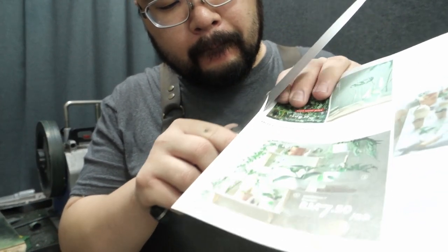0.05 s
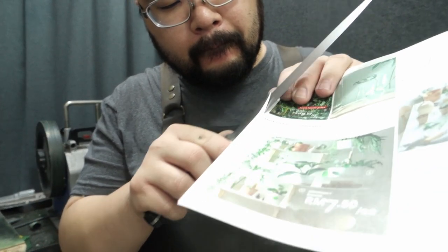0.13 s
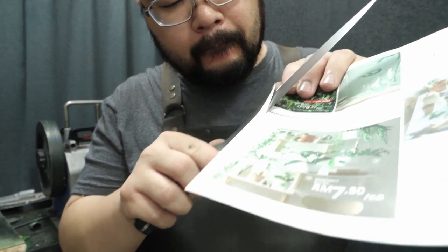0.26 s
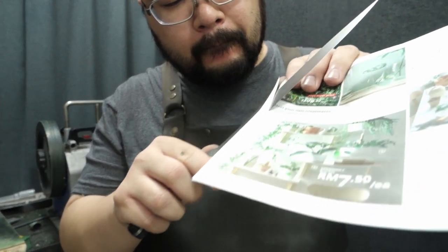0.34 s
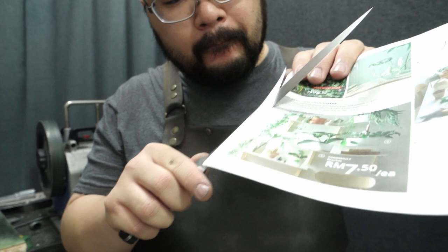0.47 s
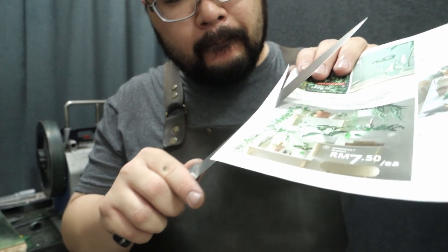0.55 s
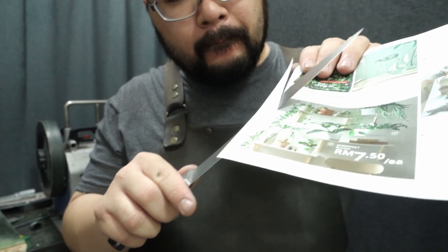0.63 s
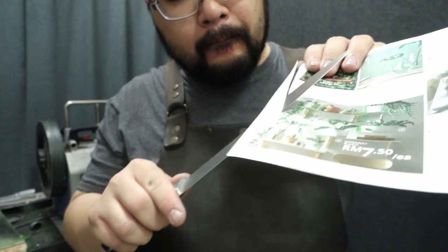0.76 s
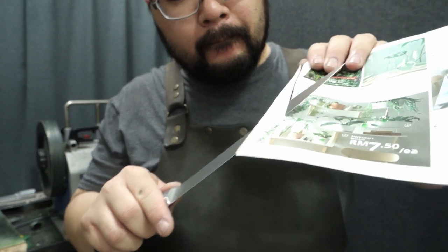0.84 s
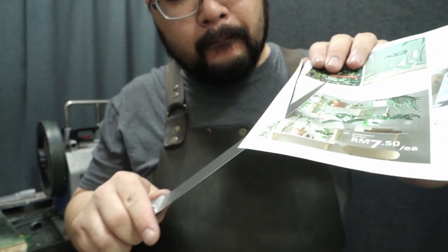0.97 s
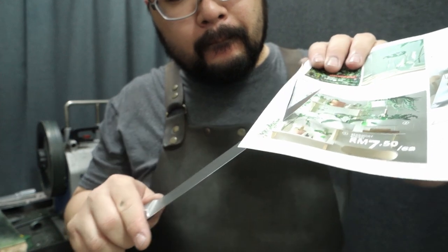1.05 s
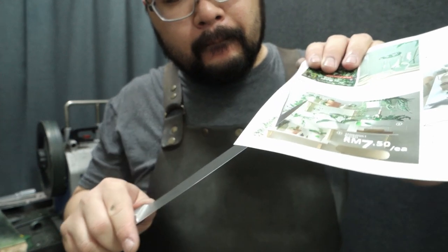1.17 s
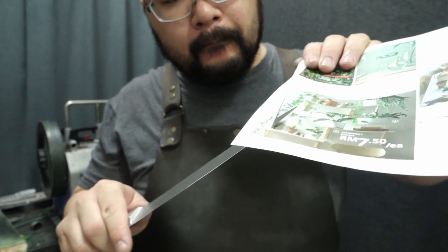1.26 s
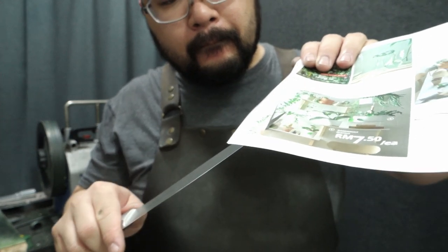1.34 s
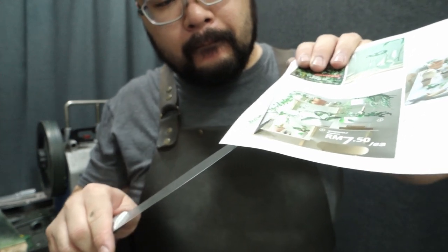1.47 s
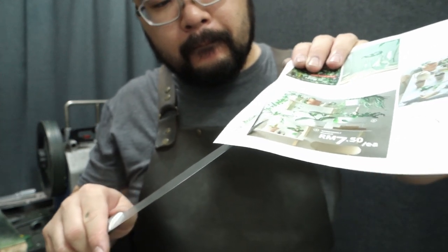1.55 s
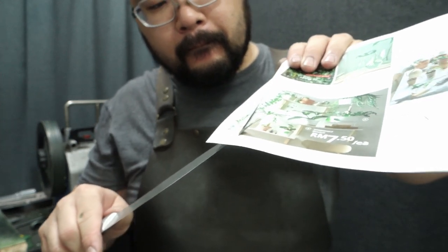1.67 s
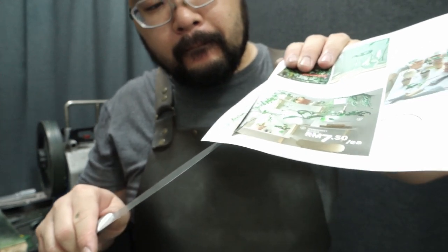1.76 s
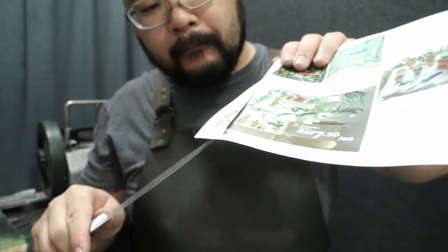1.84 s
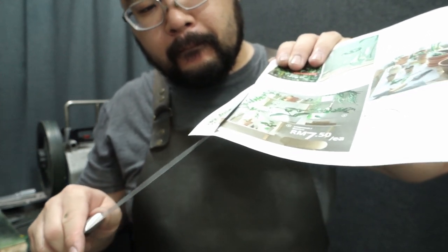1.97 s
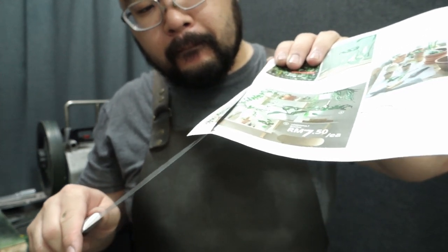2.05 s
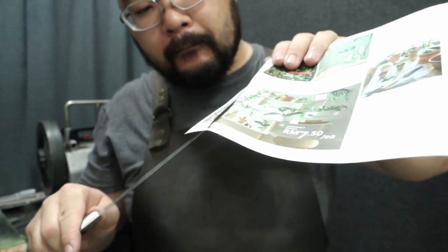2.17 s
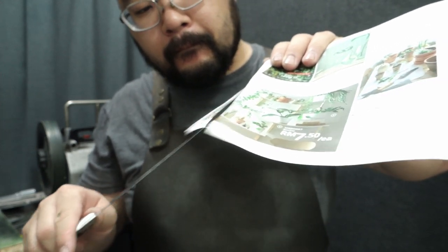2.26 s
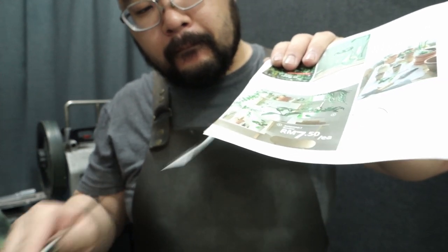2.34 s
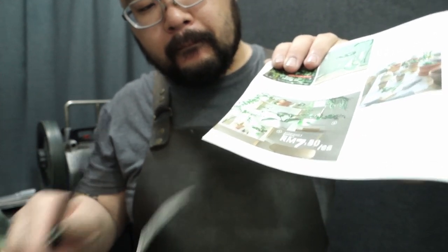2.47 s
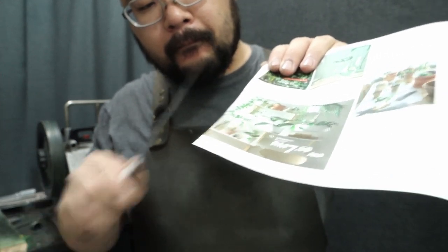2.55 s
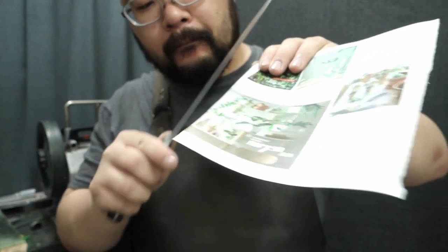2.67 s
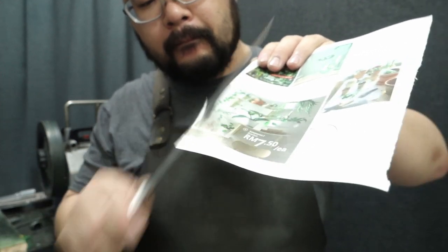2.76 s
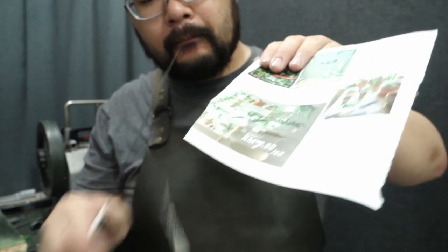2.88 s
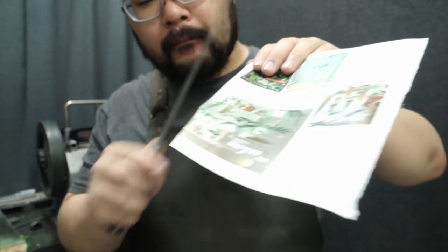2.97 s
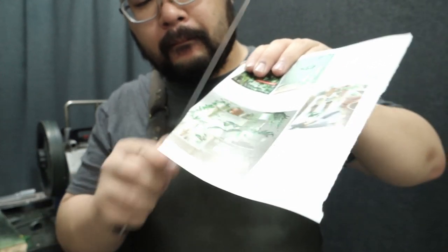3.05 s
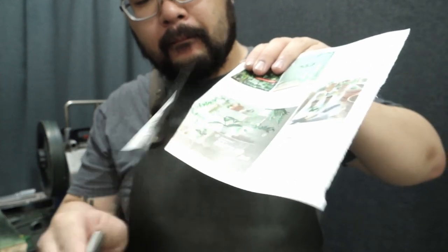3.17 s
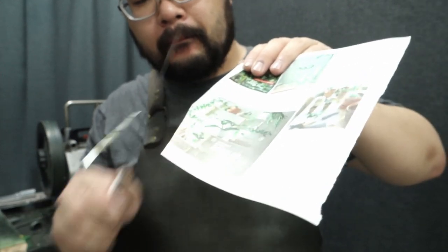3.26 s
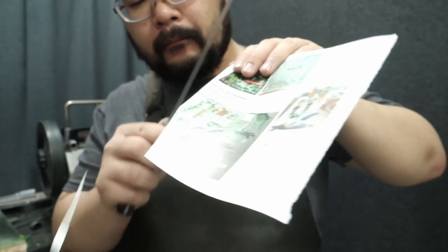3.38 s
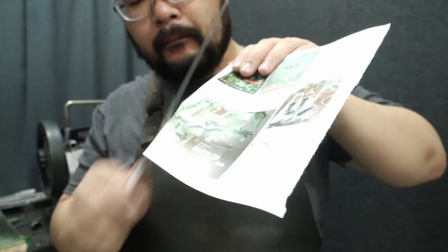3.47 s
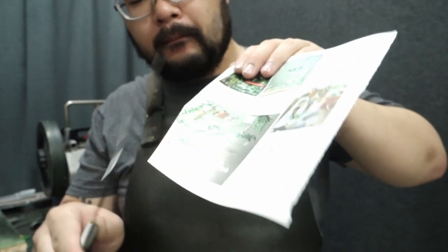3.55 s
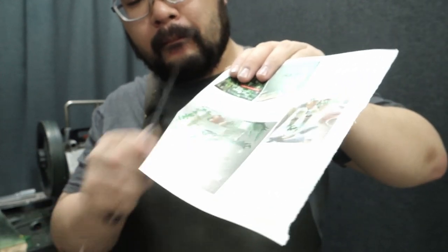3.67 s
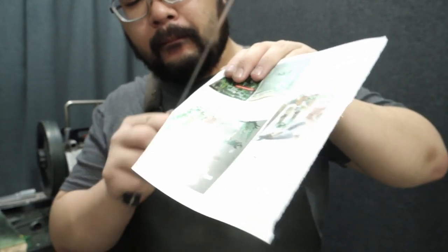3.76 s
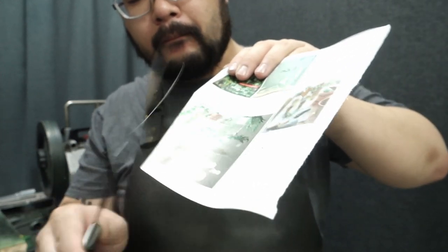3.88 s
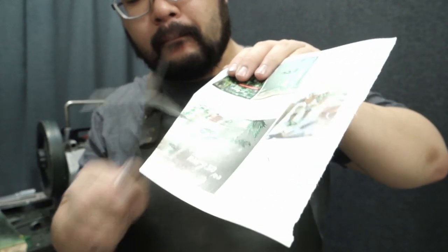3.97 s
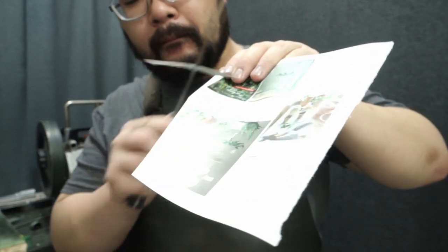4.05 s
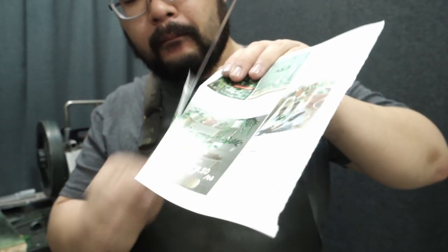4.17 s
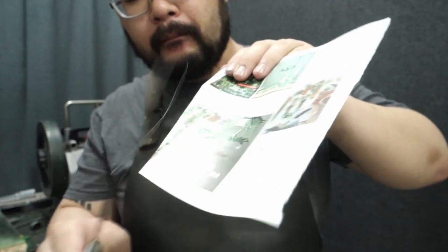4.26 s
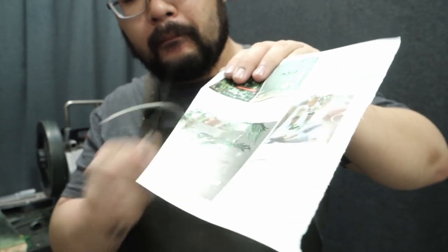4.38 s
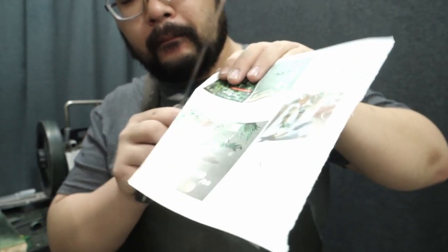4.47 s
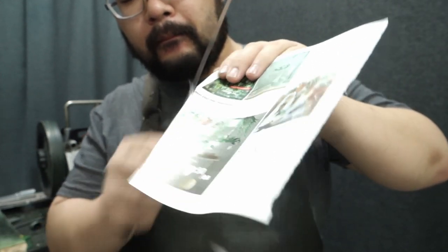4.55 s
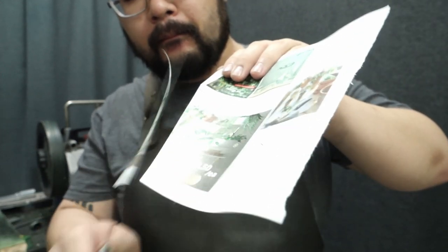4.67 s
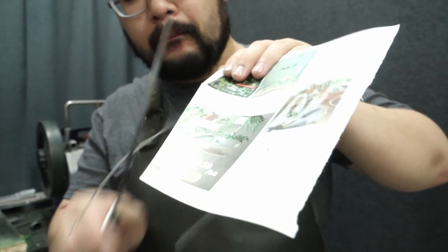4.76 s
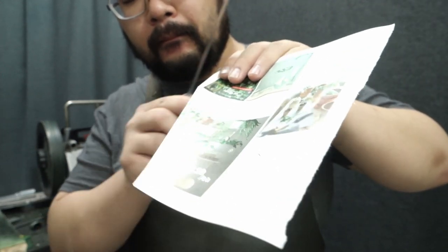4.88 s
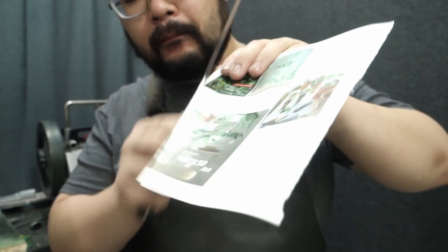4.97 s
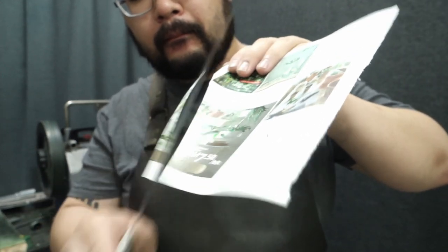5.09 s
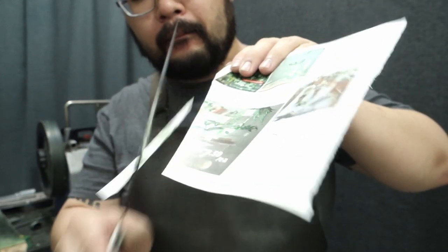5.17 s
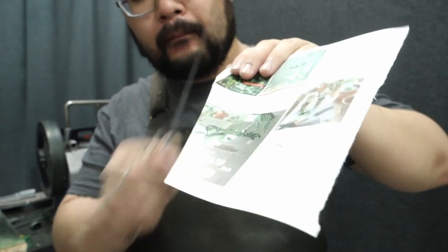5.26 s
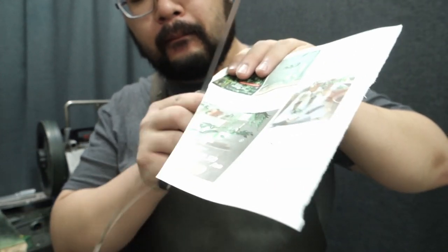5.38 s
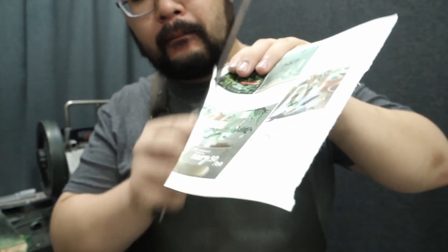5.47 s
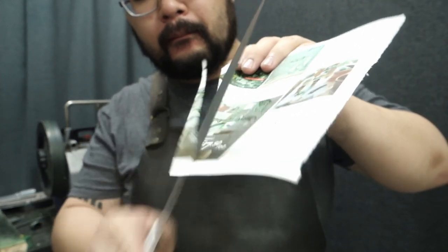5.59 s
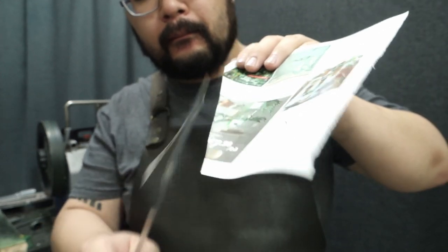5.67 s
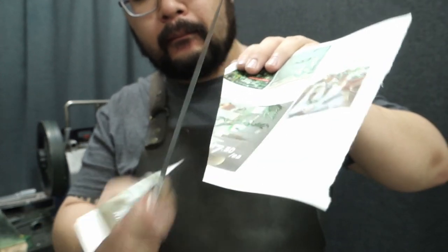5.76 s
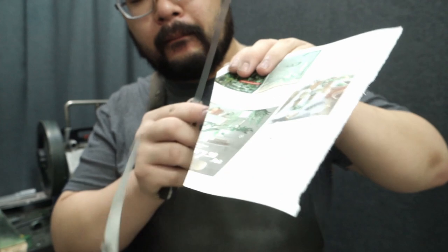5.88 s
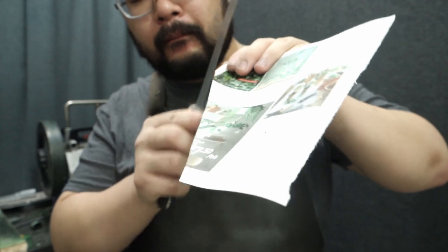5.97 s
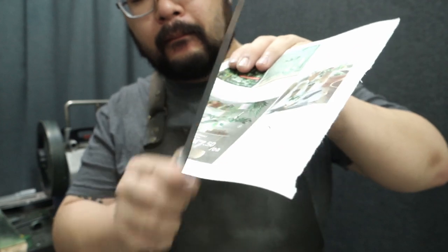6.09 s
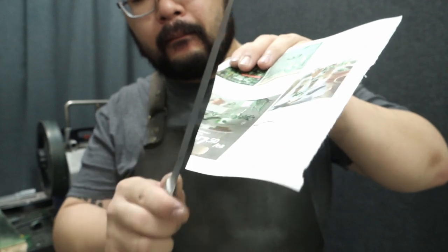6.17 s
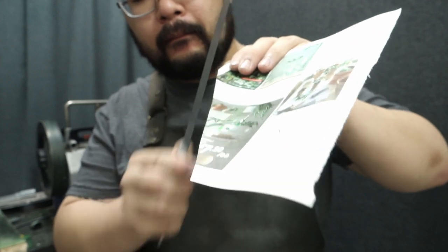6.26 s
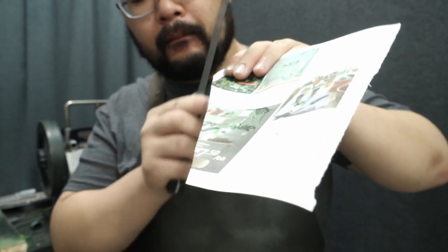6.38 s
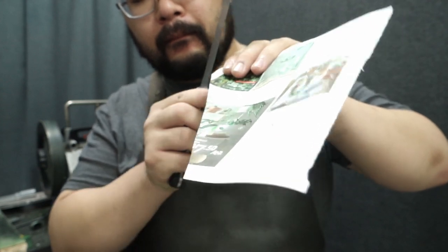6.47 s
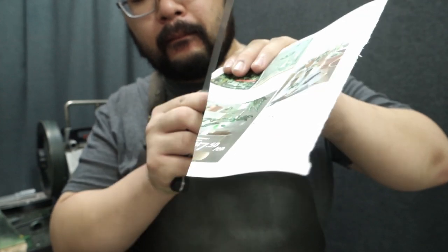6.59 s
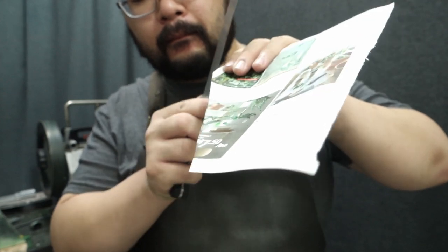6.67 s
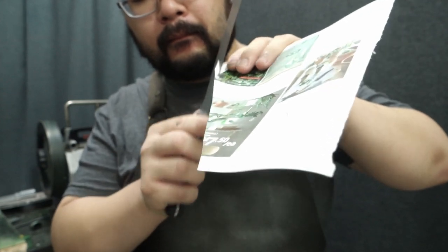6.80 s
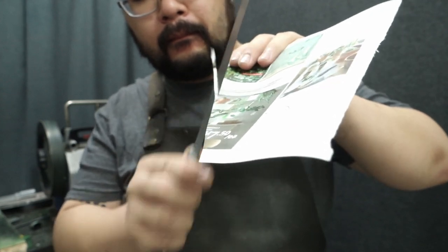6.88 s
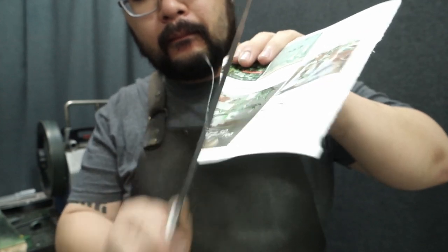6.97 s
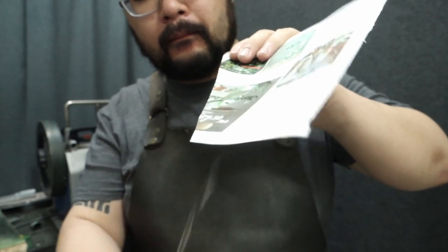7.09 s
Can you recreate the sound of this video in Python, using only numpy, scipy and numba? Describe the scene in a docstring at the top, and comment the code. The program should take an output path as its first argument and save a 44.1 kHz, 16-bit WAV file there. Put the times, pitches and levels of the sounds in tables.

```python
"""A kitchen knife slices a hand-held sheet of glossy paper, close to a two-port microphone in a small workshop.
One slow draw, a last tear, eight quick strokes and a swelling final cut; between them the sheet crinkles.
Fibres snap at the edge: their fizz is heard directly, and they shake the sheet and flex the loose strip.
The steel zings as it slides and knocks as it bites; a sleeve brushes an apron, and a fan runs behind."""
import sys
import numpy as np
from scipy import signal
from scipy.fft import rfft, irfft
from scipy.io import wavfile
from scipy.ndimage import uniform_filter1d
from numba import njit

SR = 44100
rng = np.random.default_rng(int(sys.argv[2]) if len(sys.argv) > 2 else 0)


def unload_audio(sound):
    """Save the sound as a 16-bit wav file, at the path given as the first command line argument."""
    columns = np.transpose(np.atleast_2d(sound))
    # keep every value between -1 and 1, then stretch to whole-number steps
    steps = np.round(np.clip(columns, -1, 1) * 32767)
    wavfile.write(sys.argv[1], SR, steps.astype(np.int16))


N = 314433
TIME = np.arange(N) / SR


def undb(db):
    """Decibels to gain."""
    return 10 ** (np.asarray(db) / 20)


def unit(x):
    """Scale to rms 1."""
    return x / np.sqrt(np.mean(x ** 2))


def noise():
    """White noise."""
    return rng.standard_normal(N)


def wander(turns_per_s):
    """Glide from one random value to the next."""
    return np.interp(TIME * turns_per_s, np.arange(N), noise())


def colour(x, points, size=1024):
    """Minimum-phase filter through (frequency_hz, gain_db) points."""
    hz, db = np.transpose(points)
    grid_hz = np.maximum(np.fft.rfftfreq(size, 1 / SR), 1)
    gain = undb(np.interp(np.log(grid_hz), np.log(hz), db))
    cepstrum = irfft(np.log(gain))
    cepstrum[1:size // 2] *= 2
    cepstrum[size // 2 + 1:] = 0
    return signal.oaconvolve(x, irfft(np.exp(rfft(cepstrum))))[:N]


@njit
def resonate(x, hz, damping):
    """Moving resonance; returns its band-pass and high-pass outputs."""
    band, high = np.empty(len(x)), np.empty(len(x))
    band_state, low_state = 0., 0.
    for i in range(len(x)):
        g = np.tan(np.pi * hz[i] / SR)
        velocity = (band_state + g * (x[i] - low_state)) / (1 + g * (g + damping))
        low = low_state + g * velocity
        band_state, low_state = 2 * velocity - band_state, 2 * low - low_state
        band[i] = damping * velocity
        high[i] = x[i] - band[i] - low
    return band, high


def steep_band(x, hz, damping):
    """Two passes through the same moving band-pass."""
    return resonate(resonate(x, hz, damping)[0], hz, damping)[0]


def contact(start_s, end_s, rise_s=0.0014, fall_s=0.0052):
    """One contact: its samples, its progress 0-1 and its envelope."""
    span = slice(int(start_s * SR), min(N, int((end_s + 10 * fall_s) * SR)))
    t = np.maximum(TIME[span] - start_s, 0)
    attack = 1 - np.exp(-t / rise_s)
    release = np.exp(-np.maximum(TIME[span] - end_s, 0) / fall_s)
    return span, np.minimum(t / (end_s - start_s), 1), attack * release


def fibre_snaps(per_s, spread_db):
    """Fibres break at random moments with random strength."""
    breaks = rng.random(N) < per_s / SR
    return unit(breaks * np.sign(noise()) * undb(spread_db * np.clip(noise(), -2, 2)))


# Close-up spectra of the fizz at the edge and of the loose strip: frequency_hz, gain_db
FIZZ_SPECTRUM = [(300, -59), (2500, -19.5), (4300, -9.5), (5100, 1), (6100, 5), (7200, 1.5), (8600, 2),
                 (10200, 2.5), (11200, -1)]
STRIP_SPECTRUM = [(200, -13), (500, 4.5), (700, 9.5), (1000, 7.5), (1400, 11), (2500, -9.5)]

def paper(spectrum, sheet_hz, strip_hz, snaps_per_s, spread_db, bunches_per_s, bunch_db, ring_db, damping):
    """Sheet, fizz and strip sounds of a steady cut; the fibres give way in bunches."""
    bunches = undb(bunch_db * np.clip(wander(bunches_per_s), -2, 2))
    sheet = unit(colour(fibre_snaps(snaps_per_s, spread_db) * bunches, spectrum))
    # one resonance stands out of the sheet's many and wobbles as the paper flutters
    ring_hz = sheet_hz * (1 + 0.059 * wander(50))
    ring = steep_band(fibre_snaps(snaps_per_s, spread_db) * bunches, ring_hz, damping)
    fizz = colour(fibre_snaps(2 * snaps_per_s, spread_db) * bunches, FIZZ_SPECTRUM)
    strip = colour(fibre_snaps(snaps_per_s, spread_db) * bunches, STRIP_SPECTRUM)
    # the strip hardly radiates below its lowest bending resonance
    strip = resonate(strip, strip_hz, damping=0.7)[1]
    strip = resonate(strip, 0.74 * strip_hz, damping=1.43)[1]
    return np.array([unit(sheet + undb(ring_db) * unit(ring)), unit(fizz), unit(strip)])


# The sheet under a slow blade: frequency_hz, gain_db
SLOW_SHEET_SPECTRUM = [(120, -59), (500, -40), (900, -6), (1300, -3), (1900, 0), (2700, -1), (3300, -10),
                       (4200, -18), (7000, -33)]
# Pressure of the draw, heard as the sheet's level: time_s, level_db
DRAW_PRESSURE = [(0, -34), (.1, -35), (.16, -40), (.42, -34.5), (.56, -31), (.7, -31.5), (.78, -39),
                 (.86, -35), (1.08, -35.5), (1.27, -44.5), (1.41, -38.5), (1.58, -45), (2.1, -47)]
# The paper bends as a strip comes free: time_s, sheet_hz, strip_hz, strip_over_sheet_db
PAPER_BEND = [(0, 1630, 595, -9.5), (.3, 1700, 535, -16.5), (.6, 1870, 600, -17), (.85, 1910, 352, -3),
              (1.1, 2310, 296, -5), (1.35, 2580, 500, -1.5), (2.05, 1750, 440, -8.5)]

def slow_draw(end_s=2.095, fastest_s=0.45, slowing_db_per_s=7.0, judder_from_s=1.565, judder_hz=9.46):
    """One long draw: the fizz fades as the blade slows, and near the end it sticks and slips evenly."""
    judder_db = -4.0 * np.sin(2 * np.pi * judder_hz * np.maximum(TIME - judder_from_s, 0))
    sheet_db = np.interp(TIME, *np.transpose(DRAW_PRESSURE)) + judder_db + 1.24 * wander(40.14)
    time_s, *columns = np.transpose(PAPER_BEND)
    sheet_hz, strip_hz, strip_over_sheet_db = (np.interp(TIME, time_s, column) for column in columns)
    strip_db = sheet_db + strip_over_sheet_db
    # the fizz follows about half of the sheet's swing around -35 dB
    fizz_db = -42 + 0.54 * (sheet_db + 35) - slowing_db_per_s * np.abs(TIME - fastest_s)
    span, _, envelope = contact(0, end_s)
    gains = np.zeros((3, N))
    gains[:, span] = envelope * undb([sheet_db[span], fizz_db[span], strip_db[span]])
    return gains * paper(SLOW_SHEET_SPECTRUM, sheet_hz, strip_hz, snaps_per_s=5000, spread_db=5.3,
                         bunches_per_s=450, bunch_db=1.16, ring_db=-3.0, damping=0.69)


# Faint brushes of the cutting arm: start_s, length_s, level_db
SLEEVE_BRUSHES = [(0, 0.23, -65), (2.795, 0.082, -63), (3.917, 0.34, -66.5), (4.68, 0.054, -78),
                  (5.122, 0.18, -67)]
# Rubbed cloth: frequency_hz, gain_db
CLOTH_SPECTRUM = [(60, -41), (170, -7), (300, 4), (450, 3), (1200, -21.5), (4000, -38.5)]

def sleeve():
    """The sleeve rubs on the apron, soft and dull."""
    gain = np.zeros(N)
    for start_s, length_s, level_db in SLEEVE_BRUSHES:
        span, _, envelope = contact(start_s, start_s + length_s, rise_s=0.012, fall_s=0.03)
        gain[span] += undb(level_db) * envelope
    friction = noise() * undb(3 * wander(30))
    return gain * unit(colour(friction, CLOTH_SPECTRUM))


# The workshop's room tone at the microphone: frequency_hz, gain_db
FAN_SPECTRUM = [(40, -31), (100, -41), (185, -16), (300, -18.5), (520, -13.5), (600, -4.5), (650, 2.5),
                (720, -2), (820, -13.5), (1080, -4), (1520, -13.5), (1780, -3), (1980, -17.5), (2200, -7),
                (2900, -23.5), (11000, -27)]

def fan(level_db=-56.0, waver_db=2.0):
    """A fan's steady rush with a few hollow resonances; its hiss differs most between the ports."""
    mid, side = (unit(colour(noise(), FAN_SPECTRUM, size=4096)) for _ in range(2))
    side = colour(side, [(2000, -7), (4500, 0.5)])
    return undb(level_db + waver_db * wander(5.9)) * (mid + np.array([side, -side]))


# The steel edge zings as it slides: start_s, length_s, starting_pitch_hz, level_db
EDGE_ZINGS = [(.057, 0.35, 5780, -51), (.188, 0.27, 10460, -49), (0.749, .2, 6900, -48),
              (1.349, 0.51, 6450, -61), (2.764, .028, 8500, -35), (5.088, 0.037, 10150, -25.5),
              (5.569, .022, 9900, -23.5), (5.606, 0.019, 8040, -31), (6.767, 0.12, 6500, -37.5),
              (6.886, 0.046, 7800, -30), (6.958, 0.043, 9100, -27)]

def zings(pitch_drop=0.093):
    """Narrow, falling bands of hiss from the edge rasping along the fibres."""
    out = np.zeros(N)
    for start_s, length_s, starting_pitch_hz, level_db in EDGE_ZINGS:
        span, progress, envelope = contact(start_s, start_s + length_s,
                                           rise_s=0.045 * length_s, fall_s=0.13 * length_s)
        pitch_hz = starting_pitch_hz * (1 - pitch_drop * progress)
        hiss = steep_band(rng.standard_normal(len(pitch_hz)), pitch_hz, damping=0.18)
        out[span] += undb(level_db) * envelope * unit(hiss)
    return out


# Buckles and small tears in the hand: start_s, length_s, sheet_db, fizz_over_sheet_db
SHEET_CRINKLES = [(2.268, 0.012, -36.5, -7.5), (2.285, .012, -30.5, -9), (3.284, .008, -48.5, -14),
                  (3.329, 0.0079, -50.5, -5), (4.361, .0034, -32, -4.5), (4.436, 0.018, -51, -2.5),
                  (4.486, 0.012, -50, -7), (5.267, .028, -53.5, 5.5), (5.771, 0.032, -51, 3),
                  (6.115, 0.019, -55.5, -7), (6.189, 0.027, -56, -1.5), (6.472, 0.047, -51, -6),
                  (7.063, 0.0035, -31, -7), (7.07, 0.031, -40, -20)]

def crinkles(strip_over_sheet_db=-7.0):
    """Sheet, fizz and strip gains as the paper buckles or tears: short ones snap, long ones swell."""
    gains = np.zeros((3, N))
    for start_s, length_s, sheet_db, fizz_over_sheet_db in SHEET_CRINKLES:
        span, _, envelope = contact(start_s, start_s + length_s,
                                    rise_s=0.23 * length_s, fall_s=0.3 * length_s)
        levels_db = [sheet_db, sheet_db + fizz_over_sheet_db, sheet_db + strip_over_sheet_db]
        gains[:, span] += undb(levels_db)[:, None] * envelope
    return gains


# Quick strokes close to the microphone: start_s, end_s, sheet_peak_db
QUICK_STROKES = [(2.749, 2.801, -29.5), (3.108, 3.173, -27), (3.459, 3.531, -24), (3.813, 3.909, -24),
                 (4.164, 4.269, -24), (4.553, 4.681, -23), (4.993, 5.13, -24.5), (5.446, 5.621, -23.5)]

def strokes(peak_after_s=0.047, sag_db_per_s=67):
    """Sheet, fizz and strip gains of single pushes; a longer one fizzes more and frees a louder strip."""
    gains = np.zeros((3, N))
    for start_s, end_s, sheet_peak_db in QUICK_STROKES:
        span, progress, envelope = contact(start_s + 0.001, end_s - 0.002, rise_s=0.001, fall_s=0.002)
        length_s = end_s - start_s
        sheet_db = sheet_peak_db - sag_db_per_s * np.abs(TIME[span] - start_s - peak_after_s)
        fizz_db = -28 + 24 * length_s + 2 * (progress - 0.5)  # brightens along the stroke
        strip_db = -52 + 63 * length_s - 7 * (progress - 0.5)  # fades as the strip slackens
        gains[:, span] += envelope * undb([sheet_db, fizz_db, strip_db])
    return gains


# The knock of steel on the paper's rim: frequency_hz, gain_db
BITE_SPECTRUM = [(30, -17), (150, -24.5), (400, -10), (900, -0.5), (2500, 3), (4400, -27), (7000, -19.5),
                 (11000, -5)]

def bites(over_sheet_db=20.5, crush_db=-15.0):
    """The edge knocks on the paper's rim at the start of each quick stroke, and the rim crushes."""
    force = np.zeros(N)
    for start_s, _, sheet_peak_db in QUICK_STROKES:
        span, _, envelope = contact(start_s + 0.001, start_s + 0.002, rise_s=0.0003, fall_s=0.0033)
        bite = undb(crush_db) * envelope * rng.standard_normal(len(envelope))
        bite[0] = -1  # the knock itself
        force[span] += undb(sheet_peak_db + over_sheet_db) * bite
    return colour(force, BITE_SPECTRUM)


FINAL_PEAK_S = 6.925

def final_cut(start_s=6.692, end_s=7.018, swell_db_per_s=42.0, taper_db_per_s=56.0):
    """Gains for the last cut: the sheet swells and tapers while the fizz keeps growing with speed."""
    span, progress, envelope = contact(start_s, end_s, rise_s=0.0047, fall_s=0.013)
    from_peak_s = TIME[span] - FINAL_PEAK_S
    sheet_db = -25 + np.minimum(swell_db_per_s * from_peak_s, -taper_db_per_s * from_peak_s)
    fizz_db = -40 + 16 * progress
    strip_db = -42.5 - 2.5 * progress
    gains = np.zeros((3, N))
    gains[:, span] = envelope * undb([sheet_db, fizz_db, strip_db])
    return gains


# The sheet under a fast blade: frequency_hz, gain_db
QUICK_SHEET_SPECTRUM = [(120, -60.5), (600, -31.5), (1000, -7.5), (1400, -6.5), (1800, 0), (2250, -2),
                        (3100, -2), (3700, -6.5), (4400, -23), (7000, -20.5)]

def fast_cuts(rest_hz=1876, final_lift_hz=720, stroke_end_hz=2368, climb_hz_per_s=3000, strip_hz=385.):
    """Crinkles, strokes and final cut; in a stroke the resonance climbs as the uncut part shortens."""
    # it also lifts where the last cut pulls hardest
    sheet_hz = rest_hz + final_lift_hz * np.exp(-((TIME - FINAL_PEAK_S) / 0.072) ** 2)
    for start_s, end_s, _ in QUICK_STROKES:
        span, progress, _ = contact(start_s, end_s)
        sheet_hz[span] = stroke_end_hz - climb_hz_per_s * (end_s - start_s) * (1 - progress)
    sounds = paper(QUICK_SHEET_SPECTRUM, sheet_hz, np.full(N, strip_hz), snaps_per_s=12000, spread_db=2.0,
                   bunches_per_s=600, bunch_db=1.96, ring_db=1.0, damping=0.53)
    return sounds * (crinkles() + strokes() + final_cut())


def reflections(t60_s, delay_s):
    """Dense echoes of unit energy that start after a delay and die away."""
    t = TIME[:SR]
    tail = rng.standard_normal(SR) * undb(-60 * t / t60_s) * (t > delay_s)
    return tail / np.sqrt(np.sum(tail ** 2))


def near_echoes(x, t60_s, delay_s, drifts_per_s=7.):
    """Short echoes off hands, blade and sheet; their pattern drifts as these move."""
    weights = np.array([wander(drifts_per_s) for _ in range(4)])
    weights /= np.sqrt(np.sum(weights ** 2, axis=0))
    return sum(w * signal.oaconvolve(x, reflections(t60_s, delay_s)[:SR // 8])[:N] for w in weights)


def wall_echo(x, split_hz=5700):
    """Late echoes off the walls; the curtains take the treble first."""
    low_pass = signal.butter(2, split_hz, fs=SR, output="sos")
    high_pass = signal.butter(2, split_hz, "high", fs=SR, output="sos")
    low = signal.sosfilt(low_pass, reflections(t60_s=0.31, delay_s=0.00653))
    high = signal.sosfilt(high_pass, reflections(t60_s=0.24, delay_s=0.0064))
    return signal.oaconvolve(x, low + high)[:N]


def pan(ports, balance):
    """Share each frequency between left and right."""
    hz, left_minus_right_db = np.transpose(balance)
    left = 2 / (1 + undb(-left_minus_right_db))
    curves = [np.column_stack([hz, 20 * np.log10(gain)]) for gain in (left, 2 - left)]
    return np.array([colour(port, curve) for port, curve in zip(ports, curves)])


# Difference between the microphone's ports relative to their sum: frequency_hz, gain_db
PORT_DIFFERENCE = [(200, -20), (1200, -13), (2400, -18.5), (3400, -5.5), (4400, 3), (5600, -3.5),
                   (8000, -4), (11000, -4.5)]
# A cut to the right of the microphone and one in front of it: frequency_hz, left_minus_right_db
BALANCE_RIGHT = [(500, -2), (1600, -3), (2700, -1.5), (4000, -13.5), (5700, -8), (8000, -8), (11000, -17.5)]
BALANCE_FRONT = [(600, 0), (2700, 0), (4400, -5), (6000, -2.5), (8000, -3.5), (11000, -4.5)]
# Where the cut runs, from in front (0) to the right (1): time_s, right_share
CUT_POSITION = [(0, 0.6), (1.8, 0.7), (3.2, 0.3), (3.5, 0)]

def workshop(direct, walls_db=-7.5, near_db=-8.):
    """At the close microphone near surfaces echo at once, walls later; the ports differ most in treble."""
    walls_mid, walls_side = (undb(walls_db) * wall_echo(direct) for _ in range(2))
    mid = direct + undb(near_db) * near_echoes(direct, t60_s=0.069, delay_s=0.00071) + walls_mid
    side = colour(near_echoes(direct, t60_s=0.01, delay_s=0) + walls_side, PORT_DIFFERENCE)
    ports = mid + side, mid - side
    right_share = np.interp(TIME, *np.transpose(CUT_POSITION))
    return right_share * pan(ports, BALANCE_RIGHT) + (1 - right_share) * pan(ports, BALANCE_FRONT)


def scene():
    """All the cuts sound close up in the same small room, over its fan."""
    cuts = (slow_draw() + fast_cuts()).sum(axis=0)
    return workshop(cuts + bites() + zings() + sleeve()) + fan()


def record(dry, low_cut_hz=70., ceiling_db=-18.5, window_s=0.013, top_hz=11100):
    """The microphone thins the deep bass, a limiter flattens the loudest strokes, the top is cut steeply."""
    low_cut = signal.butter(2, low_cut_hz, "high", fs=SR, output="sos")
    top_cut = signal.ellip(12, 0.2, 70, top_hz, fs=SR, output="sos")
    thinned = signal.sosfilt(low_cut, dry)
    power = uniform_filter1d(np.mean(thinned ** 2, axis=0), int(window_s * SR))
    limiter_gain = (1 + (power / undb(ceiling_db) ** 2) ** 2) ** -0.25
    return signal.sosfilt(top_cut, thinned * limiter_gain)


dry = scene()
out = record(dry)
unload_audio(out)
```